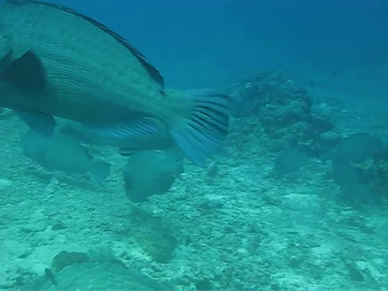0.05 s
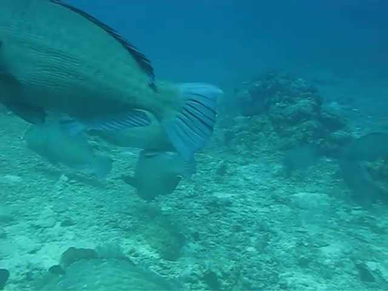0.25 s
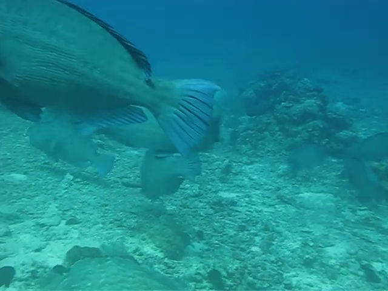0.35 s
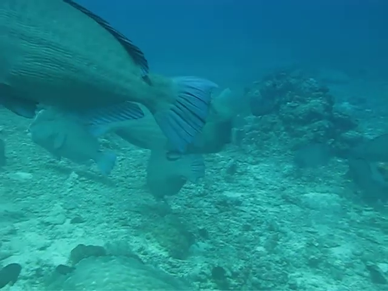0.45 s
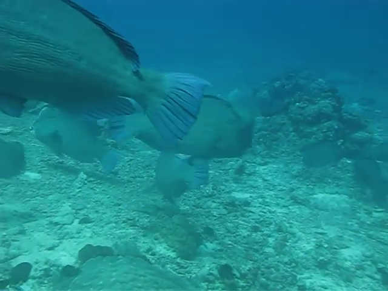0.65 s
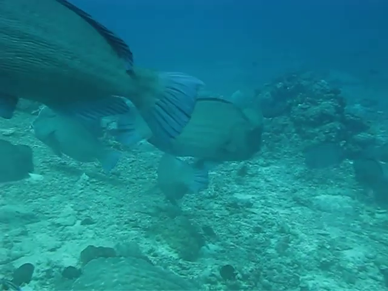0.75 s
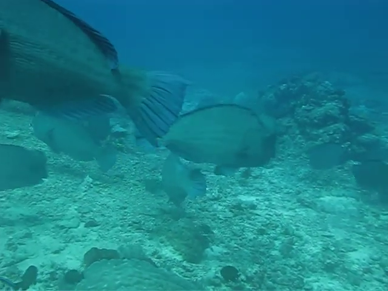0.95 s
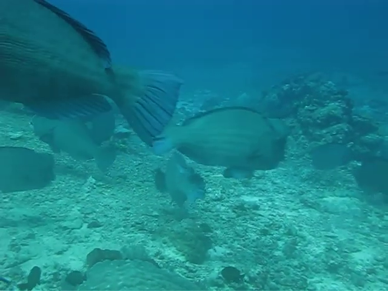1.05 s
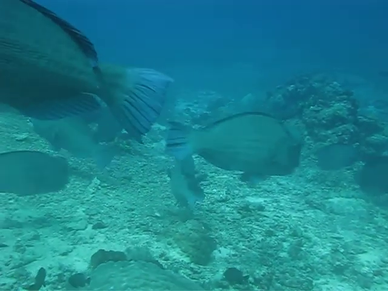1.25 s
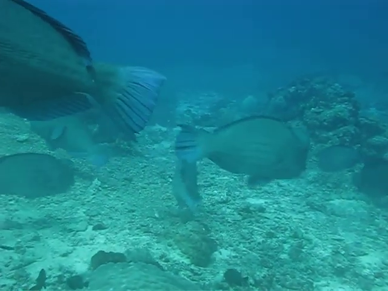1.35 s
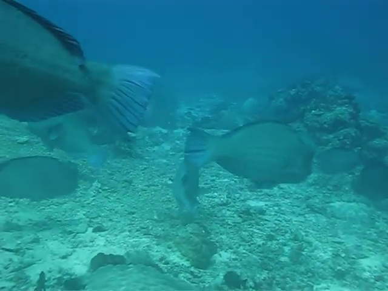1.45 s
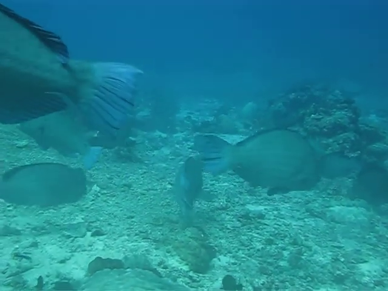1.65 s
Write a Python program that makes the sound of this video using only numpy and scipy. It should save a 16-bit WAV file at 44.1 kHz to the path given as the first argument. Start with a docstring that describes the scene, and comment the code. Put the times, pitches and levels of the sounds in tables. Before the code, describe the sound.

Fish crunch coral rubble underwater, heard boxy and resonant inside a camera housing. Steady hiss, faint crackle and a thin high whine open, with tiny clicks and a brief hum from 0.15 seconds. A very loud, dry knock hits at 0.21, dipping the background. Crisp crunches cluster at 0.27-0.39, strongest near 0.36; smaller bites and gritty scrapes continue, busier around 1.2 and 1.5, until 1.7.

```python
"""Large fish bite coral rubble on a reef, heard from inside a camera housing under water.
The sound opens with a settling offset, over water noise, crackle and a thin whine that soon fades.
Small crunches and a brief hum lead to a hard knock on the housing: damped modes clip, the gain dips.
Then come more crunches (splintering noise bursts), short hums (gliding sines) and scrapes (dense ticks).
Shell resonances colour the water, crunches, crackle and scrapes; the water noise runs to the end."""
import sys
import numpy as np
from scipy import signal
from scipy.fft import rfft, irfft, next_fast_len
from scipy.io import wavfile
from scipy.ndimage import uniform_filter1d

SR = 44100
rng = np.random.default_rng(int(sys.argv[2]) if len(sys.argv) > 2 else 0)


def inscribe(sig):
    """Save sig as 16-bit PCM at rate SR to the path in sys.argv[1].

    A 1-D sig is mono; a 2-D sig holds one channel per row.
    Samples are clipped to [-1, 1] before scaling.
    """
    pcm = np.round(np.clip(np.atleast_2d(sig).T, -1, 1) * 32767)
    wavfile.write(sys.argv[1], SR, pcm.astype(np.int16))


N = 74970  # length [samples]


def amp(db):
    """Decibel law: level [dB] to amplitude ratio."""
    return 10 ** (np.asarray(db) / 20)


def unit(x):
    """Power normalisation: scale to an rms of one."""
    return x / np.sqrt(np.mean(x ** 2) + 1e-20)


def add(out, start_s, sound):
    """Superposition: mix a sound in at its start time."""
    part = out[round(start_s * SR):][:len(sound)]
    part += sound[:len(part)]


def filtered(x, response):
    """Linear filtering: multiply the spectrum by a complex response of frequency."""
    size = next_fast_len(N + SR // 2)
    spectrum = rfft(x, size) * response(np.fft.rfftfreq(size, 1 / SR))
    return irfft(spectrum, size)[..., :N]


def follow(levels):
    """Amplitude modulation: gain over time, linear in dB between (time [s], level [dB]) points."""
    return amp(np.interp(np.arange(N) / SR, *np.transpose(levels)))


# Damped modes of the knocked housing: (frequency [Hz], level relative to KNOCK_DB [dB], T60 [s])
KNOCK_MODES = [(311, -27.5, 0.11), (711, -27.5, 0.047), (1350, -6.5, 0.022), (1470, -24, 0.053),
               (1603, 1.5, 0.0062), (2244, -34, 0.08), (1880, -15, 0.029), (2420, -14.5, 0.019),
               (3340, -16, 0.0023), (4280, -25, 0.014), (4520, -25, 0.012), (5800, -49, 0.056),
               (7370, -35, 0.0074)]
KNOCK_S, KNOCK_DB, KNOCK_RISE_S = 0.2146, 5, 0.00036
SCATTER_DB, SCATTER_T60 = -23, 0.056  # noisy tail of the knock; level relative to KNOCK_DB
THUMP_DB, THUMP_S = -27.5, 0.0014  # low thump under the knock: peak level, time to peak
PUSH_S, PUSH_DB = 0.00044, -11  # the pressure builds before the crack


def knock():
    """Modal decay: after a push, a hard knock on the housing rings as a sum of damped modes."""
    out = np.zeros(N)
    t = np.arange(SR // 8) / SR
    ring = sum(amp(db - 60 * t / t60) * np.sin(2 * np.pi * hz * t) for hz, db, t60 in KNOCK_MODES)

    sos = signal.butter(3, [900, 2400], "bandpass", fs=SR, output="sos")
    scatter = unit(signal.sosfilt(sos, rng.standard_normal(len(t))))
    scatter *= amp(SCATTER_DB - 60 * t / SCATTER_T60)
    rise = 1 - np.exp(-t / KNOCK_RISE_S)
    add(out, KNOCK_S, amp(KNOCK_DB) * (ring + scatter) * rise)

    thump = t / THUMP_S * np.exp(1 - t / THUMP_S)
    add(out, KNOCK_S, amp(THUMP_DB) * thump)

    # negative pressure grows as a square, then relaxes as the ring rises
    ramp = np.arange(round(PUSH_S * SR)) / (PUSH_S * SR)
    push = np.r_[ramp ** 2, np.exp(-t / KNOCK_RISE_S)]
    add(out, KNOCK_S - PUSH_S, -amp(PUSH_DB) * push)
    return out


# Resonances of the shell: (centre [Hz], bandwidth [Hz], level relative to the plain path [dB])
SHELL_RESONANCES = [(442, 73, 4.5), (564, 23.6, 9.5), (659, 23, 2.5), (1007, 76, -8.5), (1630, 150, -1),
                    (2662, 190, -6), (3373, 112, 2.5), (3810, 144, -6), (5860, 310, -5.5), (8400, 170, 2),
                    (10570, 237, 3.5), (12950, 500, -5.5)]


def housing(f):
    """Resonance: the plain path plus second-order bandpass modes of the shell."""
    modes = (amp(db) * 1j * f * width / (centre ** 2 - f ** 2 + 1j * f * width)
             for centre, width, db in SHELL_RESONANCES)
    return 1 + sum(modes)


# Bands of the splintering noise: (low edge [Hz], high edge [Hz], T60 [s])
CRUNCH_BANDS = [(854, 1580, 0.022), (1910, 2990, 0.02), (3180, 4380, 0.017), (4370, 7700, 0.0097),
                (7170, 11030, 0.0093), (11740, 14400, 0.0061)]
# Small bites: (time [s], then for each of the six bands the rms level over the first 6 ms [dB])
BITES = [(0.1494, -72, -63, -49, -45.5, -62, -66), (0.1563, -69, -67, -47, -46.5, -64, -51),
         (0.18, -66, -48, -54, -63, -47, -47), (0.2658, -45, -38.5, -49, -51, -48, -54),
         (0.2912, -61, -53, -62, -50, -64, -61), (0.3032, -55, -38, -36, -34, -54, -39),
         (0.3173, -64, -60, -55, -44, -61, -40.5), (0.3543, -49, -32.5, -52, -66, -62, -69),
         (0.364, -27, -31, -40.5, -33, -28.5, -36), (0.377, -41, -43, -45, -46, -55, -59),
         (0.387, -49, -53, -40.5, -53, -55, -49), (0.4333, -60, -65, -53, -50, -51.5, -48),
         (0.484, -46.5, -56, -56, -72, -71, -67), (0.5254, -60, -69, -58, -53, -68, -71),
         (0.606, -73, -60, -59, -47.5, -59, -46.5), (0.63, -68, -54, -60, -52, -64, -72),
         (0.6967, -47.5, -70, -75, -53.5, -52, -59), (0.7404, -54, -72, -70, -52, -58, -54),
         (0.759, -85, -75, -56, -54, -63, -56), (0.8117, -46.5, -65, -58, -62, -69, -56),
         (0.8733, -53, -46.5, -47, -53, -57, -49), (0.8962, -50.5, -43, -53, -55, -57, -51),
         (0.924, -62, -68, -56, -63, -60, -56), (0.941, -55, -63, -55, -52, -61, -59),
         (0.974, -54.5, -61, -53, -60, -64, -55), (0.982, -55, -61, -51.5, -51, -66, -64),
         (0.9907, -56, -58, -55, -51, -55, -57), (1.039, -54, -63, -59, -52, -58, -52),
         (1.1159, -51, -54, -47.5, -72, -67, -58), (1.165, -49, -59, -56, -45, -63, -60),
         (1.1716, -54, -60, -49, -47, -62, -38), (1.1906, -65, -60, -48, -55, -61, -54),
         (1.2028, -49, -47.5, -45, -56, -51, -58), (1.2327, -43, -50, -44.5, -51, -45.5, -43),
         (1.2404, -46, -57, -60, -68, -61, -60), (1.2524, -52, -51, -63, -63, -66, -66),
         (1.2918, -40.5, -46, -42, -59, -61, -50), (1.3878, -50, -58, -54, -63, -68, -61),
         (1.4016, -51, -66, -71, -60, -60, -51), (1.4194, -67, -68, -50, -70, -70, -72),
         (1.4862, -53, -65, -51, -48.5, -48.5, -42.5), (1.5037, -45, -45, -38.5, -60, -53, -59),
         (1.5095, -61, -46, -53, -53, -60, -47), (1.566, -60, -54, -48, -54, -57, -52),
         (1.637, -48, -70, -76, -84, -67, -68)]
CRUNCH_RISE_S = 0.00045
SNAP, SNAP_S = 1.5, 0.00077  # strong bites start with a sharp fracture: greatest extra gain, decay time
SNAP_FROM_DB, SNAP_SPAN_DB = -43, 9  # strongest-band level where the snap begins, range to its full size
RING = 1.55  # exponent on the shell response: a bite excites the housing more than the hiss does


def crunches():
    """Frequency-dependent damping: splintering noise rings the housing and dies band by band."""
    out = np.zeros(N)
    t = np.arange(SR // 20) / SR
    shell = housing(np.fft.rfftfreq(2 * len(t), 1 / SR)) ** RING
    strongest_db = np.max(np.array(BITES)[:, 1:], axis=1, keepdims=True)
    snap = SNAP * np.clip((strongest_db - SNAP_FROM_DB) / SNAP_SPAN_DB, 0, 1)

    for band, (low_hz, high_hz, t60) in enumerate(CRUNCH_BANDS):
        sos = signal.butter(4, [low_hz, high_hz], "bandpass", fs=SR, output="sos")
        envelope = amp(-60 * t / t60) * (1 - np.exp(-t / CRUNCH_RISE_S))
        noise = rng.standard_normal((len(BITES), len(t))) * envelope
        noise *= 1 + snap * np.exp(-t / SNAP_S)
        spectra = rfft(signal.sosfilt(sos, noise), 2 * len(t))
        bursts = irfft(spectra * shell)[:, :len(t)]
        for bite, burst in zip(BITES, bursts):
            onset_rms = np.sqrt(np.mean(burst[:round(0.006 * SR)] ** 2))
            add(out, bite[0], amp(bite[band + 1]) * burst / onset_rms)
    return out


# Short rings and hums: (time [s], length [s], starting frequency [Hz], glide [Hz/s],
# rms level extrapolated to the start [dB], fade [dB/s]); a negative fade swells
SHORT_TONES = [(.167, .05, 412, 450, -39, -30), (.228, .025, 445, -100, -44, 300),
               (.278, .035, 444, 10, -45, 150), (.697, .016, 1580, -2500, -40, 450),
               (.595, .025, 420, 10, -49, 50), (1.645, .03, 350, -600, -46, 150)]
HUM_EDGE_S = 0.003  # linear rise time, and time constant of the release


def hums():
    """Linear frequency modulation: brief soft sines glide while their level fades or swells."""
    out = np.zeros(N)
    for start_s, length_s, hz, glide, db, fade in SHORT_TONES:
        t = np.arange(round((length_s + 0.03) * SR)) / SR
        rise = np.minimum(t / HUM_EDGE_S, 1)
        release = np.exp(-np.maximum(t - length_s, 0) / HUM_EDGE_S)
        tone = np.sin(2 * np.pi * (hz + glide * t / 2) * t)
        add(out, start_s, np.sqrt(2) * amp(db - fade * t) * rise * release * tone)
    return out


TICK_SPREAD_DB, TICK_T60 = 2, 0.0076  # mean excess over the least level, decay time [s]


def ticks(t0, t1, per_s, least_db, centre_hz, octaves):
    """Random point process: tiny decaying noise grains of scattered pitch and size."""
    out = np.zeros(N)
    t = np.arange(SR // 100) / SR
    for when, pitch, size in rng.random((round(per_s * (t1 - t0)), 3)):
        hz = np.clip(centre_hz * 2 ** (octaves * (pitch - 0.5)), 500, 14000)
        sos = signal.butter(2, [hz / 1.4, hz * 1.4], "bandpass", fs=SR, output="sos")
        grain = rng.standard_normal(len(t)) * amp(-60 * t / TICK_T60)
        tick = unit(signal.sosfilt(sos, grain))
        tick_db = least_db - TICK_SPREAD_DB * np.log(1 - size)  # exponentially distributed excess
        add(out, t0 + when * (t1 - t0), amp(tick_db) * tick)
    return out


# Teeth drag on rock: (start [s], end [s], least tick level before the housing [dB])
TOOTH_SCRAPES = [(0.368, 0.459, -65.5), (0.803, .9, -68.5), (1.167, 1.313, -64), (1.376, 1.432, -72),
                 (1.479, 1.53, -68)]
SCRAPE_PER_S, SCRAPE_HZ = 700, 2320  # tick rate, centre of the pitch scatter
CRACKLE_PER_S, CRACKLE_HZ, CRACKLE_DB = 90, 5140, -65  # the level is the least one before the housing


def crackle():
    """Grain density: sparse far snaps all the time, denser and duller grains while teeth scrape."""
    far = ticks(0, N / SR, CRACKLE_PER_S, CRACKLE_DB, CRACKLE_HZ, octaves=3.34)
    near = sum(ticks(t0, t1, SCRAPE_PER_S, db, SCRAPE_HZ, octaves=2.8) for t0, t1, db in TOOTH_SCRAPES)
    # the scrapes take the housing's colour twice
    return filtered(far + filtered(near, housing), housing)


# Thin wavering whine: (time [s], rms level [dB])
WHINE_LEVEL = [(0, -52.5), (.17, -52), (.3, -64), (.8, -65.5), (1.2, -70), (1.7, -81)]
WHINE_HZ, WHINE_WIDTH_HZ = 3370, 60  # centre, offset at which the amplitude is halved


def whine():
    """Narrow-band noise: one sharp spectral peak gives a wavering tone."""
    noise = rng.standard_normal(N)
    tone = filtered(noise, lambda f: 1 / (1 + ((f - WHINE_HZ) / WHINE_WIDTH_HZ) ** 2))
    return unit(tone) * follow(WHINE_LEVEL)


def rush(colour, levels, patchy_db):
    """Spectral shaping: noise with time-frequency patches of random gain, through the housing."""
    z = signal.stft(rng.standard_normal(N + 512), nperseg=512)[2]
    across_bins = uniform_filter1d(rng.standard_normal(z.shape), 8, 0)
    patches = unit(uniform_filter1d(across_bins, 6, 1))
    noise = signal.istft(z * amp(patchy_db * patches), nperseg=512)[1][:N]

    hz, db = np.transpose(colour)

    def response(f):
        return housing(f) * amp(np.interp(np.log(f + 1), np.log(hz + 1), db))

    return unit(filtered(noise, response)) * follow(levels)


# Reef hiss, low surge and high sizzle. Levels: (time [s], rms level [dB]);
# colours: (frequency [Hz], relative spectral density before the housing [dB])
HISS_LEVEL = [(0.03, -42.5), (0.262, -45), (0.452, -46.5), (0.782, -47.5), (1.188, -47), (1.568, -46.5),
              (1.7, -47)]
HISS_COLOUR = [(150, -72), (260, -7.5), (400, 4.5), (659, 3.5), (840, 1), (1520, -2), (3000, -8),
               (6210, -10), (9300, -14), (16000, -8.5)]
SURGE_LEVEL = [(0.03, -57.5), (0.16, -59.5), (0.224, -44), (0.256, -55), (0.602, -60), (0.96, -58),
               (0.982, -51), (1.224, -59), (1.578, -55), (1.606, -63), (1.662, -54.5), (1.7, -62)]
SURGE_COLOUR = [(20, -15.5), (60, -9.5), (120, -5.5), (240, -3), (330, -5), (500, -77)]
SIZZLE_LEVEL = [(0, -57), (.2, -57), (.26, -68), (.34, -65), (.47, -62), (.6, -73), (1.2, -72), (1.7, -71)]
SIZZLE_SPECTRUM = [(8500, -60), (9800, -4), (10500, 1), (11500, -8), (13800, -2), (16000, -7)]


def water():
    """Incoherent sum: hiss of the reef, a low surge and a high sizzle as independent noises."""
    hiss = rush(HISS_COLOUR, HISS_LEVEL, patchy_db=1.65)
    surge = rush(SURGE_COLOUR, SURGE_LEVEL, patchy_db=1)
    sizzle = rush(SIZZLE_SPECTRUM, SIZZLE_LEVEL, patchy_db=6)
    return hiss + surge + sizzle


def scene():
    """Superposition of the knock, bites, scrapes, tones and water, as one channel."""
    return (knock() + crunches() + hums() + crackle() + whine() + water())[None]


KNEE_DB, SQUEEZE = -25, 0.93  # level where gain control starts, scale of the cut
GRAB_S, RECOVER_S = 0.0045, 0.023  # onset and recovery times of the cut
CLIP_TOP = 0.71  # amplitude limit, full scale = 1
START_S, OFFSET_DB, OFFSET_S = 0.022, -40, 0.048  # the recorder opens with a settling offset
TOP_HZ = 15900  # upper band limit


def record(dry):
    """Dynamic compression and saturation, then the recorder's opening offset and a band limit."""
    over_db = np.maximum(20 * np.log10(np.abs(dry) + 1e-9) - KNEE_DB, 0)
    t = np.arange(SR // 5) / SR
    slow = np.exp(-t / RECOVER_S) * (1 - np.exp(-(t / GRAB_S) ** 2))
    cut_db = SQUEEZE * signal.fftconvolve(over_db, slow[None])[:, :N] / (GRAB_S * SR)
    clipped = np.clip(dry * amp(-cut_db), -CLIP_TOP, CLIP_TOP)

    since = np.arange(N) / SR - START_S
    offset = amp(OFFSET_DB) * np.exp(-np.abs(since) / OFFSET_S)
    opening = np.clip(since / 0.0016, 0, 1)  # silent until START_S, then a 1.6 ms ramp
    return filtered((clipped - offset) * opening, lambda f: 1 / (1 + (f / TOP_HZ) ** 200))


dry = scene()
out = record(dry)
inscribe(out)
```